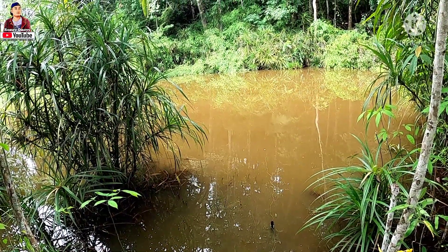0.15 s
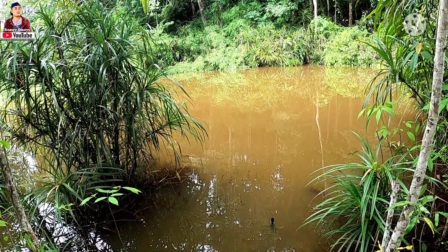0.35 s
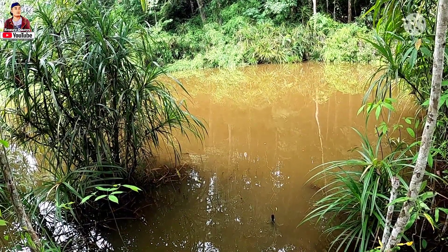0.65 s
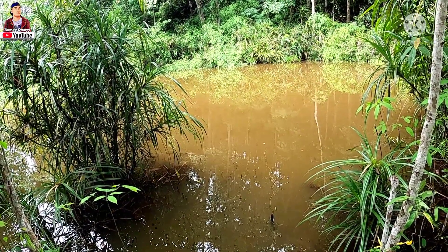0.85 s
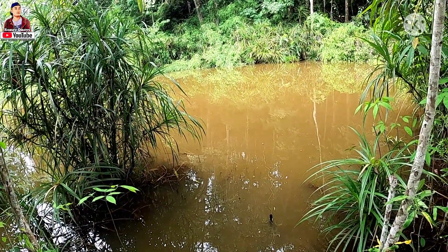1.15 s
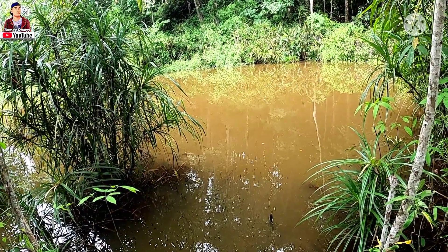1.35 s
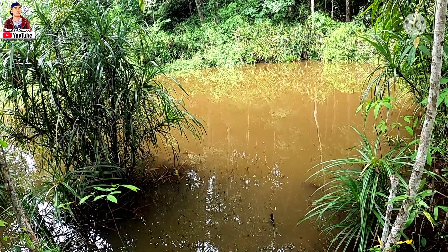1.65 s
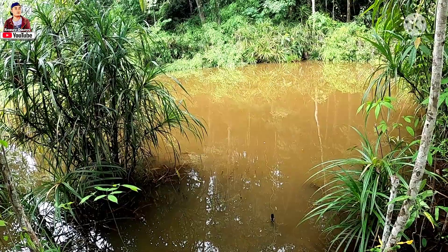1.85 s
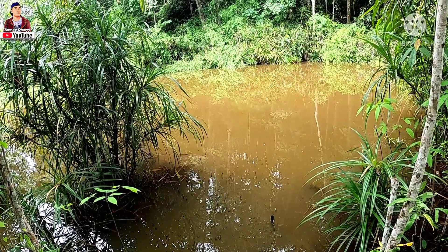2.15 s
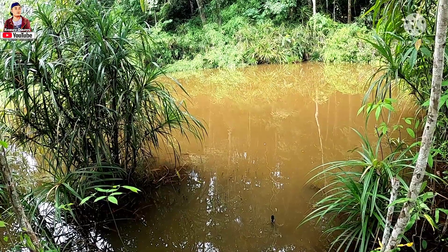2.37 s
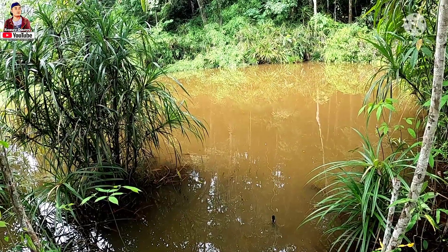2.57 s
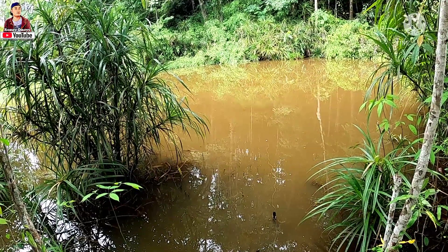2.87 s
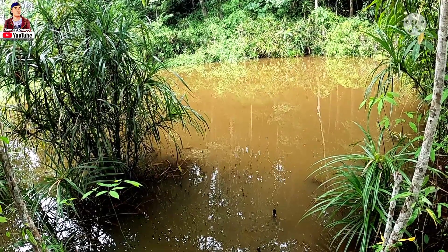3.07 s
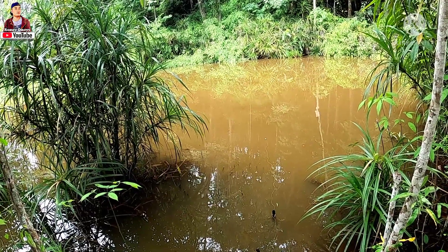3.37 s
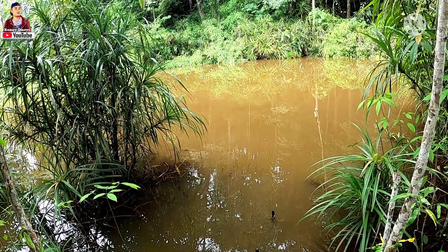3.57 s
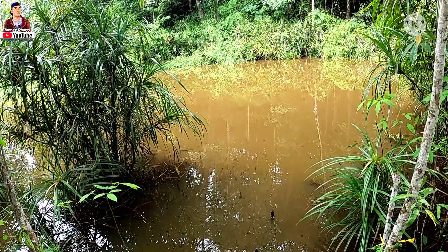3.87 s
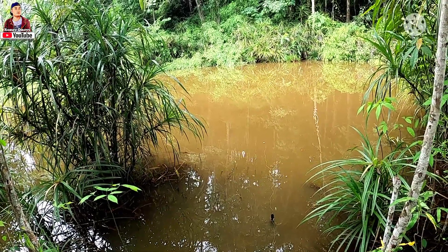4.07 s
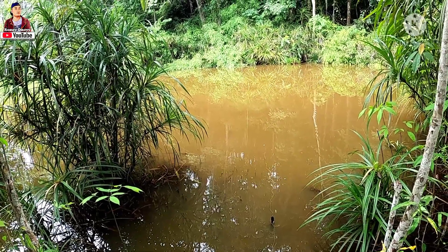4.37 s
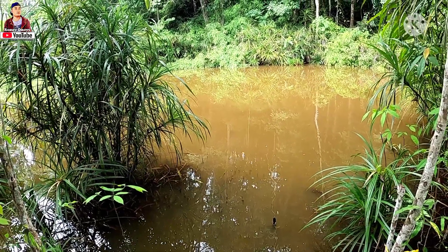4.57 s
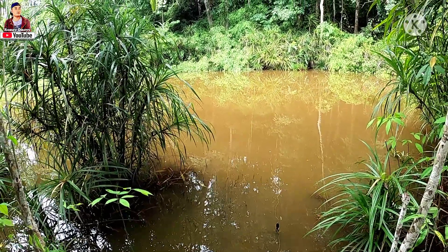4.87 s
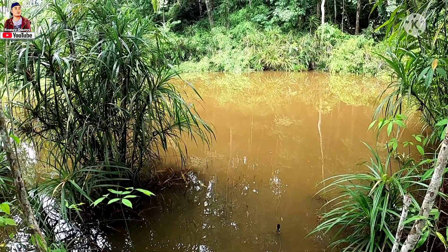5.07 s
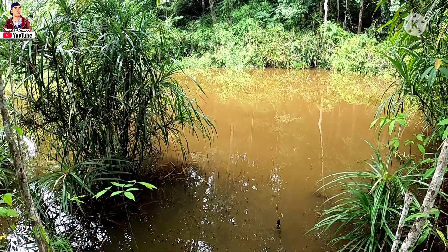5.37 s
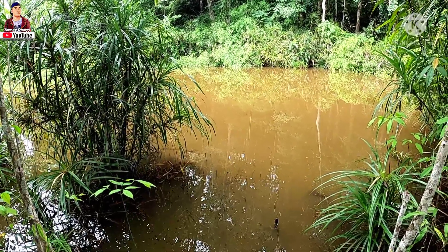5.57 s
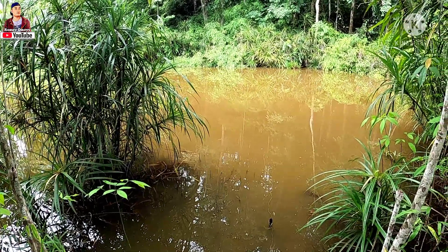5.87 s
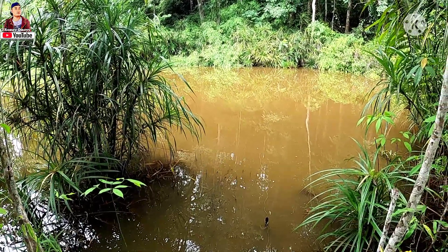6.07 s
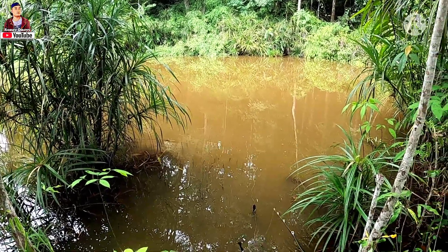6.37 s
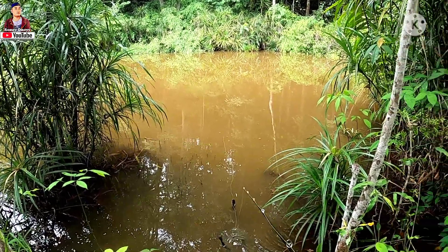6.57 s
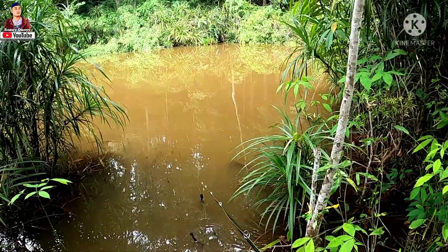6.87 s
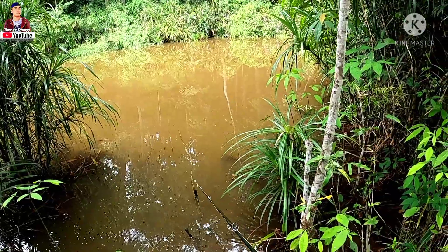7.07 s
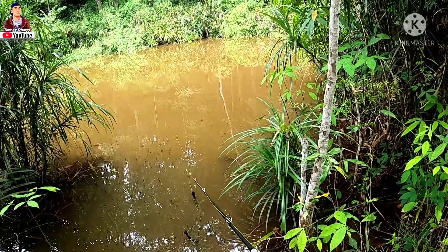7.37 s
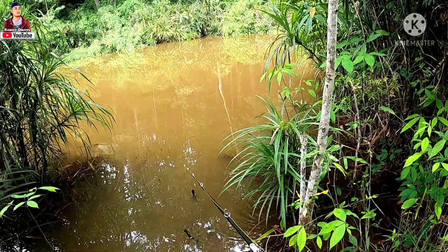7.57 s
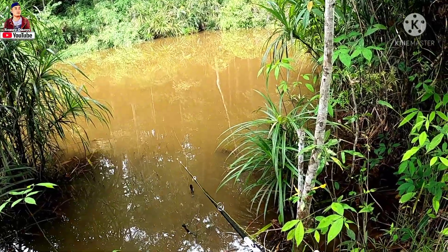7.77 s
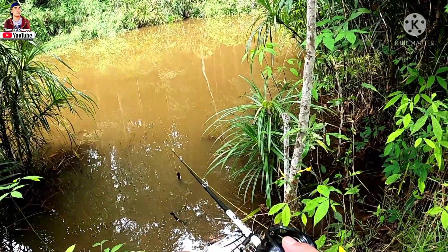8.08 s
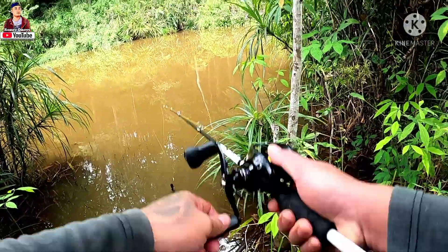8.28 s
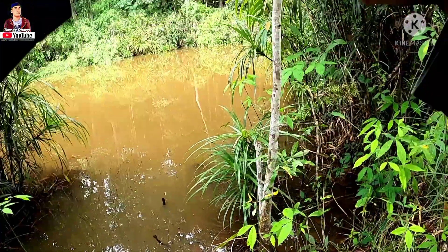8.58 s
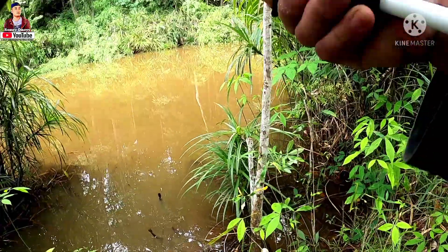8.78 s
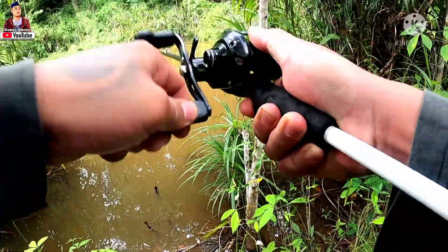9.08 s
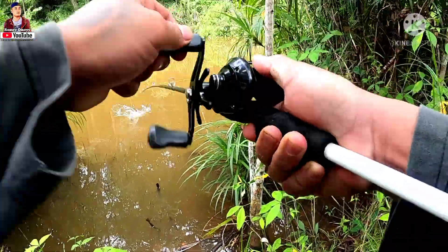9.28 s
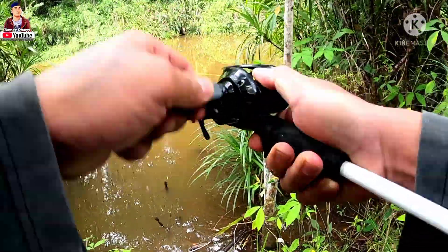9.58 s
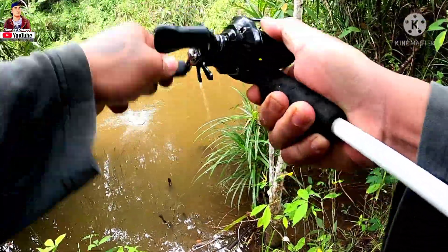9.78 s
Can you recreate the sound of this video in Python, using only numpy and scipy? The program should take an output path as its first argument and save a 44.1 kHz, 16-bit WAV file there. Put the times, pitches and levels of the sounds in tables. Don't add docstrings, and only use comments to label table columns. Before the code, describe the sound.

A high, steady cricket chorus throbs around a forest pond, with a dry katydid rasp to the right. Faint whistles and short throaty bird chucks echo dully from the trees. Near the microphone, cloth brushes softly and twigs tick. In the last second and a half, a rod is lifted, reel gears whir, metal parts clack sharply, and a fish slaps and gurgles in the water.

```python
import sys
import numpy as np
from scipy import signal
from scipy.fft import rfft, irfft, next_fast_len
from scipy.io import wavfile

SR = 44100
rng = np.random.default_rng(int(sys.argv[2]) if len(sys.argv) > 2 else 0)


def dump_mix(stems):
    frames = np.atleast_2d(stems).T
    limited = np.clip(frames, -1, 1)
    pcm = np.round(limited * 32767).astype(np.int16)
    wavfile.write(sys.argv[1], SR, pcm)


def voltage_ratio(decibels):
    exponent = np.asarray(decibels, float) / 20
    return 10 ** exponent


N = 437913


def rms_one(x):
    return x / np.sqrt(np.mean(x ** 2) + 1e-20)


def in_time(rows, quiet=None):
    s, *columns = np.transpose(rows)
    return [np.interp(np.arange(N) / SR, s, column, quiet, quiet) for column in columns]


def at_hz(points, hz):
    point_hz, value = np.transpose(points)
    return np.interp(np.log(hz + 1), np.log(point_hz + 1), value)


def drift(rate, size=N):
    knots_per_s = 400
    knots = rng.standard_normal(int(N / SR * knots_per_s) + 402)
    r = np.exp(-2 * np.pi * rate / knots_per_s)
    slow = rms_one(signal.lfilter([1], [1, -2 * r, r * r], knots)[400:])
    return np.interp(np.arange(size) * knots_per_s / SR, np.arange(len(slow)), slow)


def resonate(x, hz, width):
    r = np.exp(-np.pi * width / SR)
    feedback = [1, -2 * r * np.cos(2 * np.pi * hz / SR), r * r]
    return signal.lfilter(np.array([1, 0, -1]) * (1 - r * r) / 2, feedback, x)


def narrow(x, hz, width):
    ring = resonate(resonate(x, hz, width), hz, width)
    return ring / np.abs(ring).max(axis=-1, keepdims=True)


def body(x, modes):
    return sum(voltage_ratio(db) * (-1) ** k * resonate(x, hz, width) for k, (hz, width, db) in enumerate(modes))


def place(x, lean_db, count=2):
    return np.array([np.roll(x, count) * voltage_ratio(lean_db / 2), x * voltage_ratio(-lean_db / 2)])


def add(out, s, sound):
    at = round(s * SR)
    out[..., at:at + sound.shape[-1]] += sound[..., :N - at]


def glide(rows, waver):
    s, hz, db = np.transpose(rows)
    t = np.arange(int((s[-1] - s[0]) * SR)) / SR + s[0]
    swell, bend = drift(21, size=len(t)), drift(35.8, size=len(t))
    phase = 2 * np.pi * np.cumsum(np.interp(t, s, hz) * (1 + waver * bend)) / SR
    out = np.zeros(N)
    add(out, s[0], voltage_ratio(np.interp(t, s, db) + 3.0 + 4.1 * swell) * np.sin(phase))
    return out


# [f/Hz, left-right level/dB]
AIR_LEAN = [(60, -0.5), (110, -7), (200, -3), (380, -7.5), (700, -3.5), (1290, -1.5), (2380, 3.5),
            (4400, 4), (8120, -0.5), (15000, -14.5)]
# [f/Hz, likeness 0-1]
AIR_LIKENESS = [(60, 0.27), (200, 0.2), (1200, 0.23), (3000, 1), (5000, 0.15), (8300, 0.024)]
# [f/Hz, lead/rad]
AIR_LEAD = [(100, -2.3), (3000, 1.2), (5400, 15), (8300, -3.5)]


def diffuse(spectrum):
    size = next_fast_len(N)
    hz = np.arange(size // 2 + 1) * SR / size
    one, other = rfft(rng.standard_normal((2, size))) * voltage_ratio(at_hz(spectrum, hz))
    alike = np.clip(at_hz(AIR_LIKENESS, hz), 0, 1)
    lean = voltage_ratio(at_hz(AIR_LEAN, hz) / 2)
    shared = alike * one * np.exp(1j * at_hz(AIR_LEAD, hz))
    left = (shared + np.sqrt(1 - alike ** 2) * other) * lean
    pair = irfft([left, one / lean], size)[:, :N]
    return pair / pair.mean(axis=0).std()


# [f/Hz, level/dB per Hz]
AIR = [(15, -43), (25, -14), (50, -12), (106, -20), (161, 1), (250, -6), (390, -12), (780, -17),
       (1130, -15), (1400, -16), (1900, -24.5), (3000, -33), (4300, -41), (5500, -45), (9000, -120)]
# [f/Hz, level/dB per Hz]
CHORUS = [(1500, -34.5), (3200, -25), (4250, -33.5), (4750, -25), (5100, -19), (5400, -16), (5900, -22),
          (6500, -16.5), (7000, -13), (7250, -2), (7450, -4.5), (7650, -3), (7950, -11), (8250, -8),
          (8500, -12.5), (8940, -39), (9040, -73), (14000, -74), (14500, -51.5), (15400, -42)]
CHORUS_DB = -59.5


def surroundings():
    air = voltage_ratio(-68.5 + 1.0 * drift(2)) * diffuse(AIR)
    return air + voltage_ratio(CHORUS_DB + 0.73 * drift(13.0)) * diffuse(CHORUS)


# [wing f/Hz, waver/Hz, throbs per s, depth 0-1, level/dB, left-right level/dB]
SINGERS = [
    (7147, 10.1, 12.0, 1, 2.5, 0.1),
    (7700, 12, 12.7, 0.9, -4, -7.5),
]
# [lead at the start/throbs, slip/throbs per s]
TIMING = [(.76, -.027), (.36, .005)]
# [t/s, level/dB, left-right level/dB]
CRICKET = [(0, -59.5, 3.5), (.8, -58.5, 0.5), (1.6, -57.5, -1.5), (2.8, -57, 5.5), (3.3, -56, 0.5),
           (4.1, -58.5, 0), (4.5, -61.5, 14.5), (5.1, -65, 20), (5.5, -62.5, 11), (6.0, -65, 18.5),
           (6.6, -67.5, 18.5), (7.2, -62, 9), (7.9, -63, 16), (8.15, -62.5, -8), (8.4, -61, 10.5),
           (9.1, -66, 3), (9.9, -70, 7)]


def crickets():
    level_db, lean_db = in_time(CRICKET)
    sharpness = [1.15, 2.3]
    linger = np.exp(-1 / (0.0029 * SR))
    out, t = np.zeros((2, N)), np.arange(N) / SR
    for k, (hz, waver, per_s, depth, db, side_db) in enumerate(SINGERS):
        lead, slip = TIMING[k]
        beat = np.cos(2 * np.pi * ((per_s + slip) * t + lead + 0.038 * drift(0.82)))
        stroke = signal.lfilter([1 - linger], [1, -linger], np.exp(sharpness[k] * (beat - 1)))
        throb = (1 - depth + depth * stroke) * voltage_ratio(0.93 * drift(29))
        tone = np.sin(2 * np.pi * np.cumsum(hz + waver * drift(30.1)) / SR)
        scatter = rms_one(narrow(rng.standard_normal((2, N)), hz, 1.4 * waver))
        song = rms_one((place(tone, 0) + 0.098 * scatter) * throb)
        turn_db, gain_db = (lean_db, level_db + 0.5) if k == 0 else (side_db, CHORUS_DB)
        out = out + song * voltage_ratio(gain_db + db + np.outer([.5, -.5], turn_db))
    return out


# [t/s, lead/beats]
PAIR_LEAD = [(0, .25), (1.2, .15), (2, .25), (3.4, .41), (4.5, .3), (5.2, .18), (6, .23), (7, .16),
             (7.5, -.05), (8, -.25), (9.93, -.3)]


def katydid():
    pairs_per_s, half_gap, stroke_width = 19.3, .115, .035
    lead, = in_time(PAIR_LEAD)
    beat = (pairs_per_s * np.arange(N) / SR + lead + .5) % 1 - .5
    strokes = np.exp(-.5 * ((np.abs(beat) - half_gap) / stroke_width) ** 2)
    strokes = strokes * voltage_ratio(2.0 * drift(2) + 2.0 * drift(30))
    rasp = rms_one(narrow(rng.standard_normal(N) * strokes, 8300, 650))
    return voltage_ratio(-69.5) * place(rasp, -8)


# [t/s, length/s, first f/Hz, last f/Hz, rms level/dB]
WHISTLES = [(.13, 0.12, 1204, 1185, -76.5), (.365, 0.082, 1850, 1380, -68), (.41, 0.063, 1400, 1187, -62.5),
            (.545, 0.084, 1173, 1210, -60.5), (.6, 0.065, 1217, 1206, -75), (.655, 0.081, 1210, 1216, -63),
            (.715, 0.065, 1135, 950, -66), (.84, 0.076, 1210, 1185, -68), (.91, 0.06, 1260, 1160, -67),
            (1.98, 0.32, 1000, 963, -79), (5.53, 0.079, 1207, 1142, -66), (7.25, 0.18, 2930, 2800, -73),
            (5.46, .04, 1020, 1010, -71.5), (5.66, 0.033, 1173, 996, -67.5), (2.0, 0.14, 2020, 1990, -78)]


def whistles():
    swell_s, waver_hz = 0.041, 19
    fade_db = 8 * np.array([0.94, 0.028, 0.33, 0.73])
    out = np.zeros(N)
    for s, length, first_hz, last_hz, db in WHISTLES:
        swell = min(swell_s / length, .45)
        shares = np.array([0, swell, 1 - swell, 1])
        hz = first_hz + (last_hz - first_hz) * shares
        out += glide(np.transpose([s + length * shares, hz, db - fade_db]), waver=waver_hz / first_hz)
    return out


# [t/s, peak level/dB, voice f/Hz, brightness/dB]
NOTES = [(0.758, -52, 990, -6), (0.948, -55, 877, 4), (1.119, -55.5, 950, -18), (4.603, -54, 940, -6),
         (4.717, -57.5, 1143, 5), (4.771, -63, 894, -2), (6.884, -47.5, 970, -6), (7.055, -48, 995, -9),
         (7.097, -58, 1596, -7), (7.298, -48, 965, 5)]
# [t/s, peak level/dB, brightness/dB]
CHUCKS = [(4.769, -41, -1.5), (4.888, -44, 7), (4.937, -39.5, 5.5), (5.075, -39.5, 1.5), (5.133, -39.5, 3),
          (5.149, -48, -5), (7.007, -45, 1), (7.059, -38.5, 4), (7.199, -41.5, 5), (7.247, -38, 4.5),
          (7.449, -39.5, 1.5), (7.516, -38.5, 0.5), (7.529, -51, 18), (7.575, -64, 19)]
# [f/Hz, width/Hz, level/dB]
THROAT = [(1160, 95, 5.5), (1596, 226, 3), (1795, 410, -1.5), (2410, 960, -4.5), (3120, 1430, -10.5)]


def chucks():
    # t/s, level/dB, length/s, voice f/Hz, fall, pitch spread, roughness/dB, brightness/dB
    calls = [(s, db, .03, hz, .22, 0, 1.5, bright - 3.0) for s, db, hz, bright in NOTES]
    calls += [(s, db, .02576, 950, .383, .1, 8.0, bright) for s, db, bright in CHUCKS]
    closed_beak = signal.butter(4, 3400, fs=SR, output="sos")
    out, t = np.zeros(N), np.arange(int(.07 * SR)) / SR
    for s, db, length, hz, fall, spread, rough_db, bright_db in calls:
        luck, hoarse = rng.standard_normal(80), rng.standard_normal(len(t))
        pitch = hz * (1 + spread * luck[-1]) * (1 + fall * (.5 - t / length)).clip(.5)
        cycle = np.cumsum(pitch) / SR
        at = np.flatnonzero(np.diff(cycle.astype(int), prepend=0))[:80]
        breath = np.sin(np.pi * np.clip(t / length, 0, 1))
        pulses = np.zeros(len(t))
        pulses[at] = voltage_ratio(rough_db * luck[:len(at)].clip(-2.5, 1.2)) * breath[at]
        pulses += 0.45 * rough_db / 10 * hoarse * breath * voltage_ratio(-12.5)
        throat = [(f, w, g + bright_db * np.log2(f / 1100)) for f, w, g in THROAT]
        call = signal.sosfilt(closed_beak, body(pulses, throat))
        add(out, s - .0065, voltage_ratio(db) * call / np.abs(call).max())
    return out


def woods(x, t60):
    t = np.arange(int(.4 * SR)) / SR
    dull = signal.lfilter([.4], [1, -.6], rng.standard_normal((2, len(t))))
    tail = dull * voltage_ratio(-60 * t / t60) * (t > .004)
    tail = tail / np.sqrt((tail ** 2).sum(axis=1, keepdims=True))
    return signal.fftconvolve(x[None], tail, axes=1)[:, :N]


# [peak t/s, length/s, level/dB, brightness/dB, weight/dB]
STIR = [(0.411, 0.08, -67.5, -1, -7), (0.896, 0.19, -67, -4, -10), (1.102, 0.095, -58, -2.5, -12),
        (1.788, 0.087, -63, -5, -29), (1.921, 0.092, -56.5, -3.5, -13.5), (2.085, 0.21, -73, -23, -12),
        (3.158, 0.13, -71, -34, -26), (4.95, 1, -67.5, -7, -13), (5.256, 0.37, -67, -9.5, -4),
        (5.596, 0.51, -80, -26, 2), (5.935, 0.076, -69, -3, -19), (6.324, 0.23, -66, 4.5, -26),
        (6.326, 0.11, -81, 25, 2), (6.545, 0.12, -69.5, -2, 3), (6.716, 0.51, -67, -1, -4.5),
        (7.07, 1, -74, 8, -0.5)]
# [t/s, level/dB, brightness/dB]
LIFT = [(8.0, -89, 13), (8.18, -83.5, 14.5), (8.27, -64.5, -1), (8.379, -61.5, 4), (8.5, -65.5, 2),
        (8.62, -70.5, 10.5), (8.743, -62.5, -1)]
CRANK = [(8.745, -61, 2), (8.763, -52.5, 4.5), (8.85, -54.5, 8.5), (8.95, -53, 5), (9.05, -54.5, 5.5),
         (9.12, -51.5, 4.5), (9.21, -50.5, 7.5), (9.255, -52.5, 2.5), (9.28, -57.5, 3)]
FIGHT = [(9.28, -64, -1), (9.292, -47, 4.5), (9.34, -48.5, 4), (9.42, -43, -9.5), (9.475, -46.5, -2.5),
         (9.66, -41, -1.5), (9.71, -46, -1), (9.871, -46.5, 3), (9.93, -51, 5.5)]
# [thump against rasp/dB, hiss against whir/dB]
GRIP = [
    (-10, -43),
    (-5.5, -24),
    (-3.5, -14.5),
]


def effort():
    levels = np.full((4, N), -140.)
    for rows, (thump_db, hiss_db) in zip([LIFT, CRANK, FIGHT], GRIP):
        db, bright = in_time(rows, quiet=-140)
        levels = np.maximum(levels, [db + thump_db, db, db + bright, db + bright + hiss_db])
    for s, length, db, bright, weight in STIR:
        rise, fall = 0.32 * length, 0.68 * length
        t = np.arange(int(2 * length * SR)) / SR - 2 * rise
        at = round((s - 2 * rise) * SR)
        tops = db + np.array([weight, 0, bright, 2 * bright - 44.5])
        brush = tops[:, None] - 10.5 * np.maximum(-t / rise, t / fall)
        levels[:, at:at + len(t)] = np.maximum(levels[:, at:at + len(t)], brush)
    return levels


def grit(per_s, spread_db, smooth, apart=0.84):
    happens = rng.random(N) < per_s * voltage_ratio(4 * drift(15)) / SR
    slips = happens * voltage_ratio(spread_db * rng.exponential(1, N).clip(0, 5))
    shared = rms_one(slips * rng.choice([-1, 1], N)) + smooth * rng.standard_normal(N)
    return place(shared, 0) + apart * rng.standard_normal((2, N))


def streaky(x, modes):
    return rms_one(body(x, [(hz, width, db + 2.1 * drift(16)) for hz, width, db in modes]))


# [f/Hz, level/dB per Hz]
THUMP = [(12, -28.5), (20, 3.5), (48, 1), (92, -19.5), (129, 4.5), (182, -4), (418, -4), (800, -9),
         (1040, -42), (1760, -120)]
# [f/Hz, width/Hz, level/dB]
RASP = [(1024, 130, -1.5), (1320, 490, -3), (1750, 510, -4.5)]
# [f/Hz, width/Hz, level/dB]
WHIR = [(2300, 360, -5.5), (2810, 280, -3), (3270, 210, -1), (3664, 150, -1), (4000, 200, -1),
        (4400, 270, -3.5), (5230, 900, -12.5), (6400, 1900, -21.5)]


def handling():
    thump_db, rasp_db, whir_db, hiss_db = effort()
    size = next_fast_len(N)
    weight = voltage_ratio(at_hz(THUMP, np.arange(size // 2 + 1) * SR / size))
    low = irfft(rfft(grit(300, 3.8, 2.0, apart=0.82), size) * weight, size)[:, :N]
    treble = signal.butter(2, [4000, 10000], "band", fs=SR, output="sos")
    fine = signal.sosfilt(treble, grit(2000, 1.5, 1.0))
    thump = voltage_ratio(thump_db + 2.0 * drift(36)) * rms_one(low) * voltage_ratio([[-1.5], [1.5]])
    rasp = voltage_ratio(rasp_db + 1.1 * drift(23)) * streaky(grit(900, 3.9, 1.0, apart=0.81), RASP)
    whir = voltage_ratio(whir_db + 2.0 * drift(43)) * streaky(grit(2500, 2.2, 0.85), WHIR)
    hiss = voltage_ratio(hiss_db + 4.5 + 2.6 * drift(22)) * rms_one(fine) * voltage_ratio([[-3], [3]])
    return thump + rasp + whir + hiss


# [t/s, peak level/dB, f/Hz]
SPLASH = [(0.388, -54, 427), (5.212, -67, 493), (5.25, -62, 630), (5.29, -62.5, 526), (5.33, -66, 656),
          (5.37, -65, 440), (7.06, -58, 273), (7.13, -61, 306), (7.816, -66, 298), (9.352, -36.5, 512),
          (9.363, -34.5, 372), (9.4, -32, 497), (9.419, -32, 664), (9.56, -35, 214), (9.581, -33, 376),
          (9.609, -39, 188), (9.682, -31.5, 250), (9.724, -34, 519), (9.77, -39, 472), (9.79, -46, 387),
          (9.65, -37.5, 582), (9.69, -39.5, 415), (9.46, -43, 80), (9.866, -37, 70.4), (9.899, -45, 55)]
# [t/s, peak level/dB, f/Hz]
SLAPS = [(4.005, -57.5, 2660), (9.341, -35.5, 1420), (9.352, -35, 1680), (9.38, -37, 1140),
         (9.582, -27, 1600), (9.614, -36, 1080), (9.648, -26, 1050), (9.656, -32, 1284), (9.797, -39, 1100),
         (9.806, -35, 1150), (9.815, -51, 1080), (9.734, -40, 1010), (9.439, -35, 960)]
# [t/s, f/Hz, rms level/dB]
GURGLE = [(9.475, 591, -47), (9.5, 441, -37), (9.515, 377, -36), (9.53, 297, -35), (9.56, 188.5, -50),
          (9.585, 139.3, -44.5), (9.63, 228, -47), (9.67, 325, -52), (9.7, 332, -57)]
# [t/s, f/Hz, rms level/dB]
REFILL = [(9.55, 200, -56), (9.585, 374, -43), (9.62, 529, -52), (9.66, 613, -51)]


def splash():
    out = (glide(GURGLE, waver=0.09) + glide(REFILL, waver=0.079)) * voltage_ratio(5.1 * drift(62))
    t = np.arange(int(.1 * SR)) / SR
    for drops, t60 in [(SPLASH, 0.08), (SLAPS, 0.035)]:
        for s, db, hz in drops:
            slide = rng.normal(0, 5.0)
            swell = (1 - np.exp(-t / 0.00061)) * voltage_ratio(-60 * t / t60)
            ring = np.sin(2 * np.pi * hz * (t + slide * t * t))
            add(out, s, voltage_ratio(db) * swell / swell.max() * ring)
    return out


# [t/s, f/Hz, rms level/dB]
SPOOL = [(8.75, 1050, -69), (8.8, 1060, -78), (8.86, 1060, -74), (8.92, 1050, -54), (9.0, 1065, -61.5),
         (9.11, 1050, -53.5), (9.14, 1060, -57)]
# [t/s, f/Hz, rms level/dB]
LOADED = [(9.145, 1550, -68), (9.17, 1400, -48), (9.21, 1220, -50.5), (9.26, 1130, -57)]
# [t/s, f/Hz, rms level/dB]
GEAR = [(8.755, 2845, -74), (8.78, 2860, -47), (8.84, 2770, -69), (8.9, 2660, -46), (8.95, 2580, -70)]
# [t/s, f/Hz, rms level/dB]
LINE = [(8.38, 3270, -74), (8.48, 3310, -62), (8.6, 3360, -72), (8.72, 3400, -67), (8.76, 3400, -74)]


def spool():
    turning = glide(SPOOL, waver=0.0286) + glide(LOADED, waver=0.043)
    return turning + glide(GEAR, waver=0.021) + glide(LINE, waver=0.0298)


# [t/s, peak level/dB, ring f/Hz]
TICKS = [(0.8375, -50, 1210), (1.107, -36, 1250), (1.123, -42, 1200), (1.5268, -41, 3080),
         (1.572, -46, 1820), (1.749, -46.5, 2900), (1.785, -44, 1800), (1.8998, -27.5, 2130),
         (1.918, -37, 2300), (1.933, -38, 2060), (1.9509, -41, 1990), (1.9752, -37, 1940),
         (6.4765, -46, 2200), (7.4043, -45, 2410), (7.4092, -48, 1220), (7.41, -33, 2330)]
# [t/s, peak level/dB, ring f/Hz, top level/dB]
CLACKS = [(8.531, -35.5, 3400, -13), (8.6018, -41, 3040, -21), (8.638, -46.5, 1990, -3),
          (8.69, -52, 4170, -6), (8.761, -45, 2850, -7), (8.796, -31.5, 1220, -8.5),
          (8.8585, -32.5, 3630, -25), (8.889, -37, 2820, -21), (8.921, -38, 1150, -15),
          (8.981, -35, 3060, -28), (8.739, -46, 3460, -20), (8.998, -31.5, 1090, -26),
          (8.997, -27, 3840, -16.5), (9.069, -29, 2640, -31), (9.115, -42, 1040, -26),
          (9.236, -46, 4300, -15), (9.1443, -16, 3300, -19.5), (9.2893, -21.5, 1700, -20),
          (9.293, -19, 3010, -14.5), (9.332, -20, 3380, -10), (9.4166, -24, 3750, -10),
          (9.4192, -10, 3340, -15.5), (9.421, -29.5, 1110, -33), (9.447, -24, 1480, -26),
          (9.481, -33, 3180, -24), (9.484, -29.5, 3900, -25), (9.504, -24.5, 3100, -12),
          (9.511, -8.5, 3040, -16.5), (9.548, -9.5, 3100, -17.5), (9.571, -29, 1630, -26),
          (9.63, -24.5, 1290, -12), (9.66, -25, 1330, -10), (9.7284, -25, 3180, -31),
          (9.732, -25, 3500, -28), (9.741, -28, 3200, -18), (9.625, -31, 3300, -28),
          (9.7447, -11, 2990, -21.5), (9.744, -22.5, 1440, -27), (9.7702, -29, 1510, -13),
          (9.8236, -12, 2850, -14), (9.8565, -27, 2880, -12), (9.864, -24.5, 3630, -15),
          (9.772, -29, 4000, -20), (9.581, -25.5, 3120, -25), (9.63, -24, 3170, -22), (9.9, -33, 3120, -22)]


def ticks_and_clacks():
    # t/s, level/dB, ring f/Hz, top/dB, length/s, ring width/Hz, share of metal frame
    hits = [(s, db, hz, -40, .0005, 1100, .03) for s, db, hz in TICKS]
    hits += [(*row, .0024, 950, .6) for row in CLACKS]
    out, t = np.zeros((2, N)), np.arange(int(.03 * SR)) / SR
    for s, db, hz, top_db, length, width, frame in hits:
        noise = rng.standard_normal((3, len(t)))
        rattle = noise * np.exp(-(t / length) ** 2) * (1 - np.exp(-t / 0.00034))
        blow = rattle[0] + np.cos(2 * np.pi * hz * t) * np.exp(-(t / (0.57 * length)) ** 4)
        snap = 0.71 * rattle[0] + (t == 0) * 4.2
        main = narrow(blow, hz, width) + frame * narrow(snap, 4370, 1100)
        main += 0.13 * narrow(rattle[0], 1120, 460) + 0.33 * frame * narrow(rattle[0], 2160, 420)
        edge = voltage_ratio(top_db + 8.0) * narrow(rattle[0] + rattle[1:], 7030, 2850) * voltage_ratio([[-3], [3]])
        add(out, s, voltage_ratio(db - 4.0) * (place(main, 1.3, count=1) + edge))
    return out


def scene():
    far, bird, near = whistles(), chucks(), ticks_and_clacks()
    thinned = signal.lfilter([1, -.9], [1, -.6], bird + far)
    echoes = voltage_ratio(-5.0) * woods(thinned, t60=0.36) + voltage_ratio(-13.5) * woods(near.mean(axis=0), t60=0.017)
    background = surroundings() + crickets() + katydid()
    birds = place(far, -1.5) + place(bird, 3.5)
    angler = handling() + place(splash(), 1.0) + place(spool(), 0.4) + near
    return background + birds + echoes + angler


def low_pass(x):
    return signal.sosfilt(signal.butter(12, 16480, fs=SR, output="sos"), x)


def record(dry):
    dull = signal.sosfilt(signal.cheby2(10, 60, 16300, fs=SR, output="sos"), dry)
    return low_pass(dull)


dry = scene()
out = record(dry)
dump_mix(out)
```